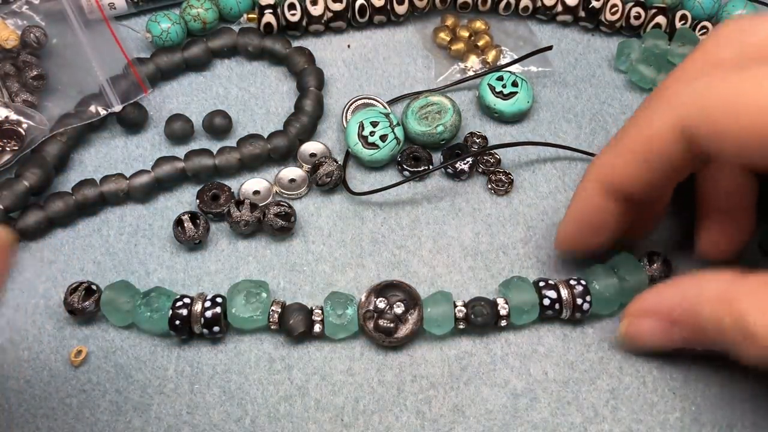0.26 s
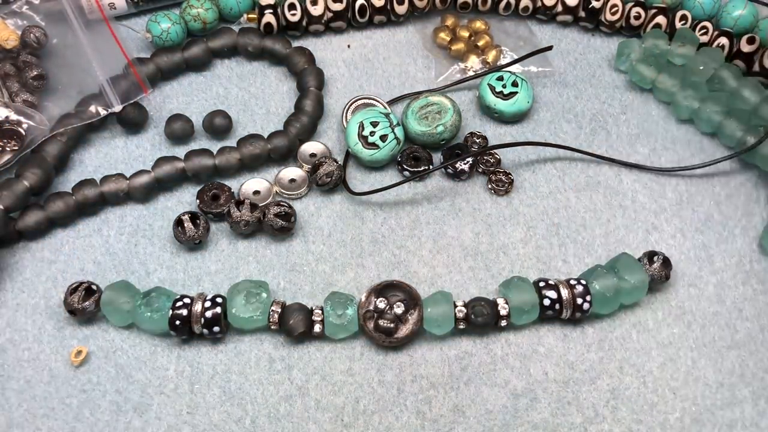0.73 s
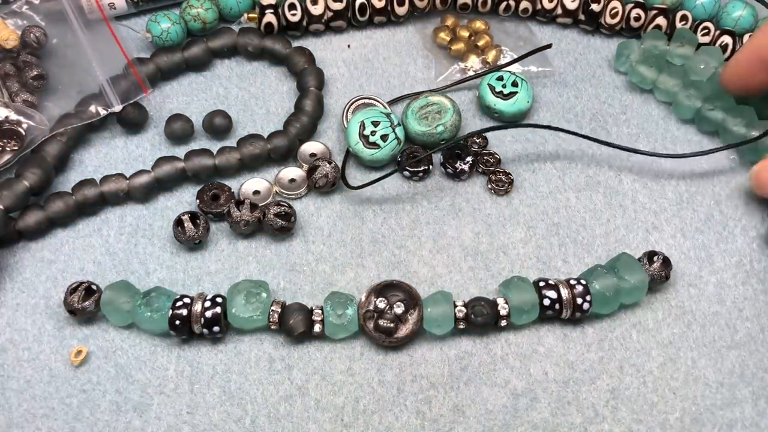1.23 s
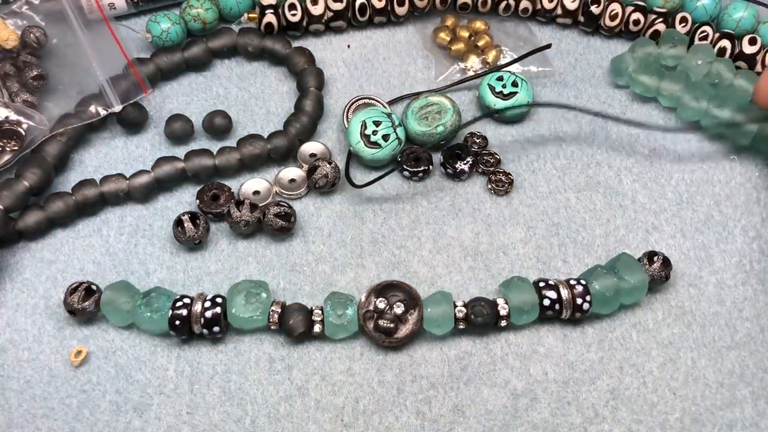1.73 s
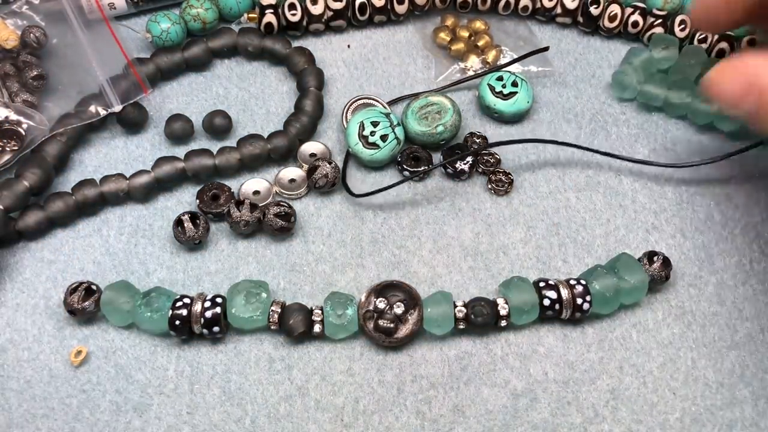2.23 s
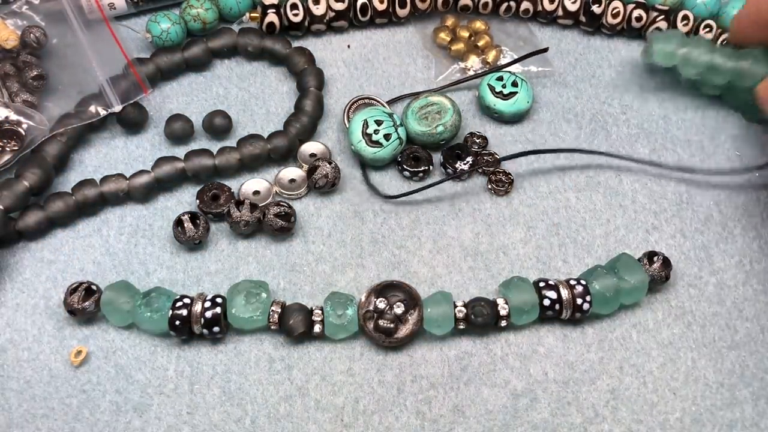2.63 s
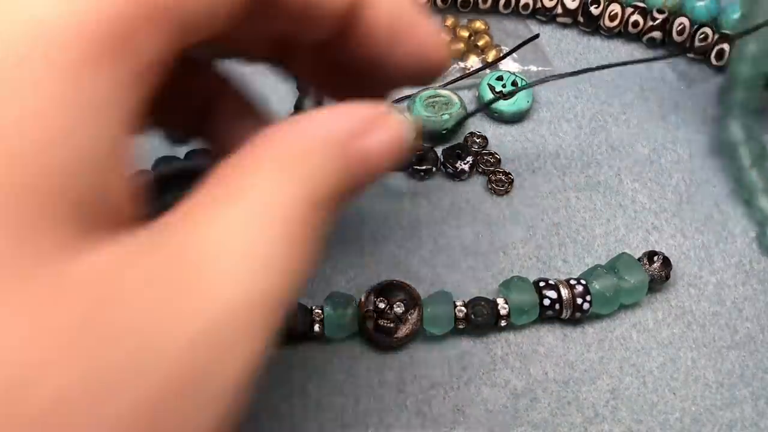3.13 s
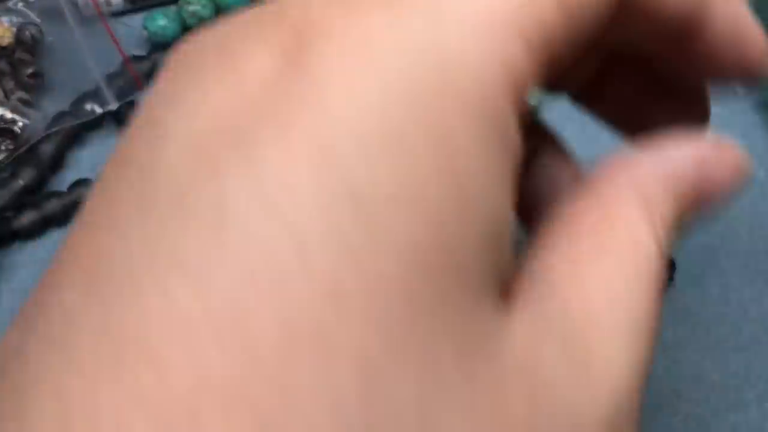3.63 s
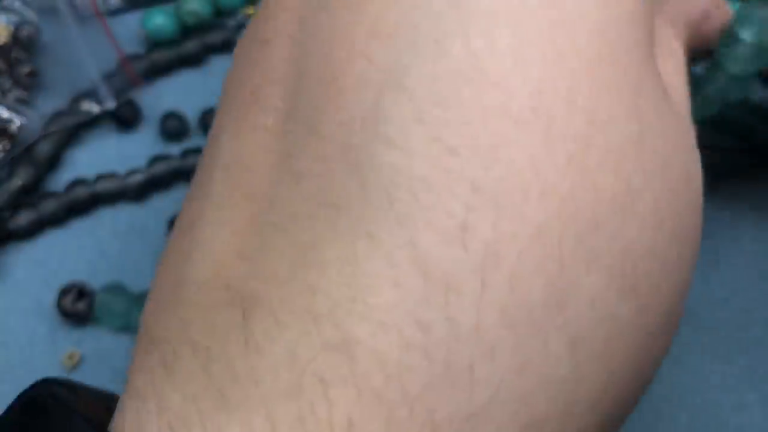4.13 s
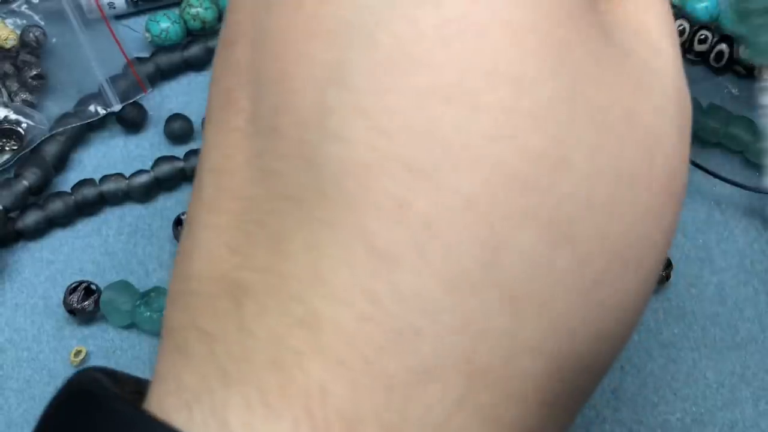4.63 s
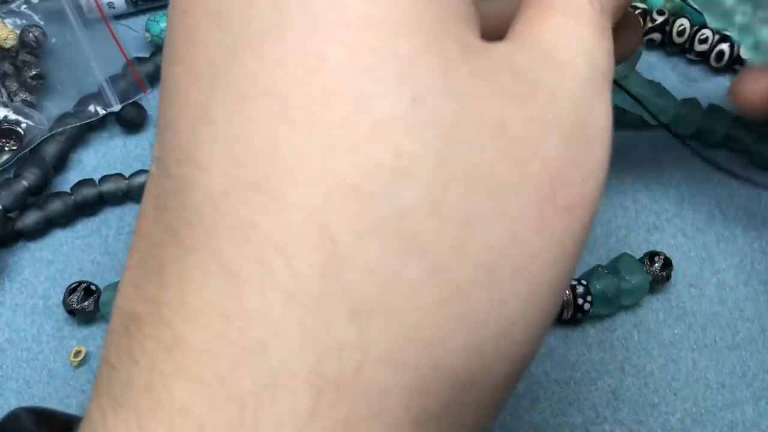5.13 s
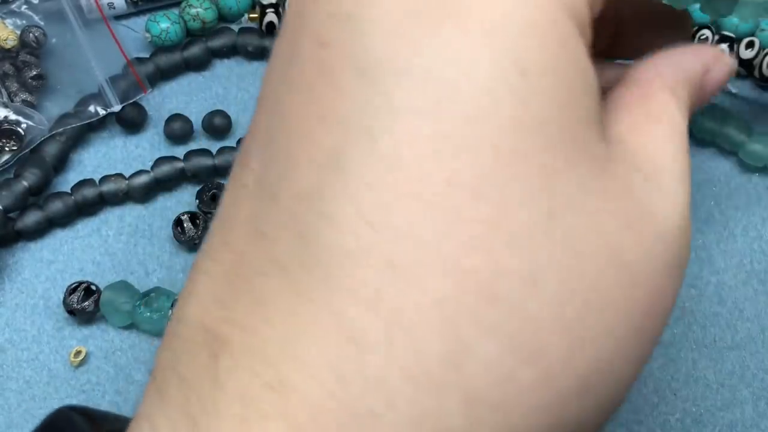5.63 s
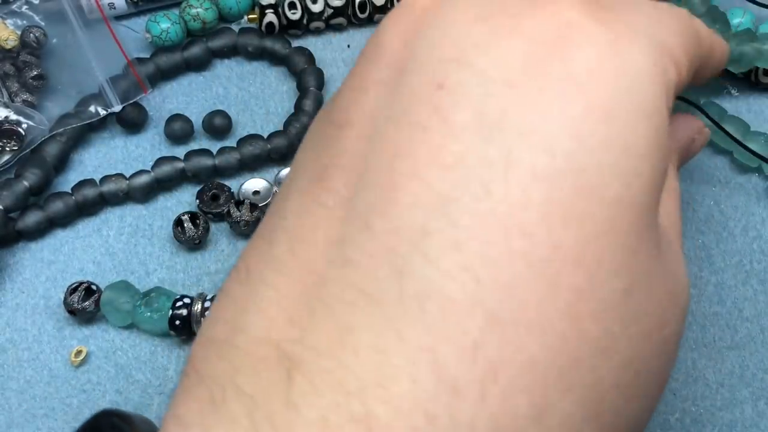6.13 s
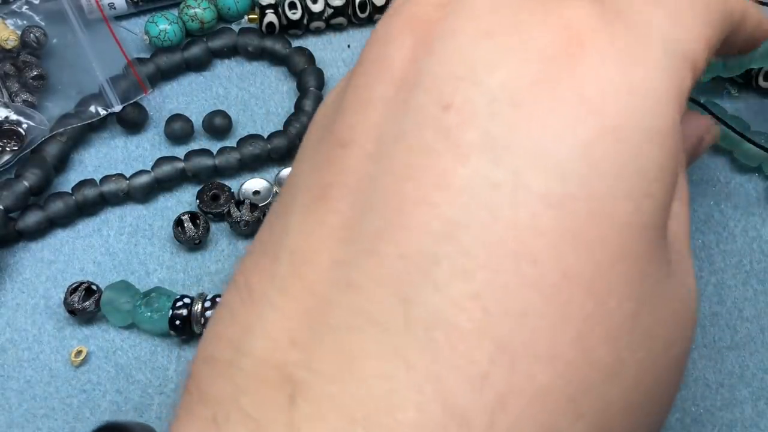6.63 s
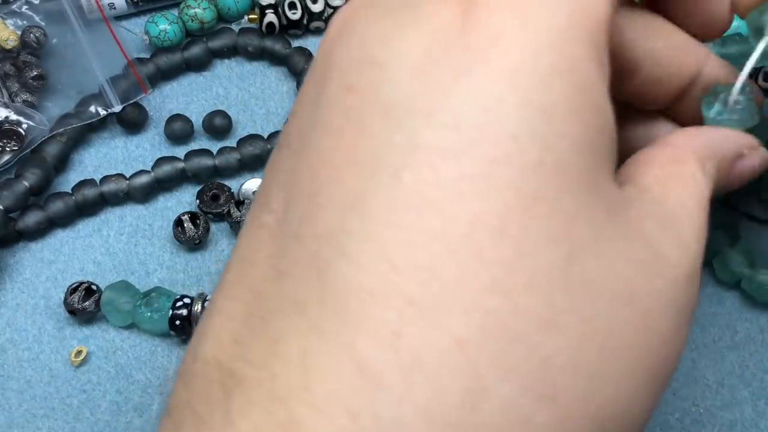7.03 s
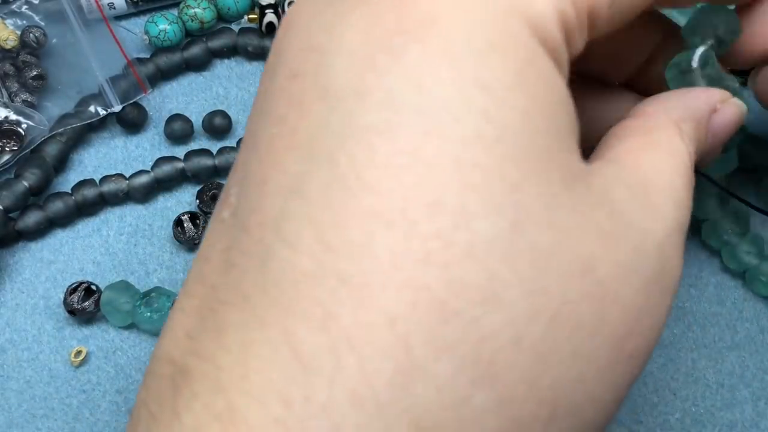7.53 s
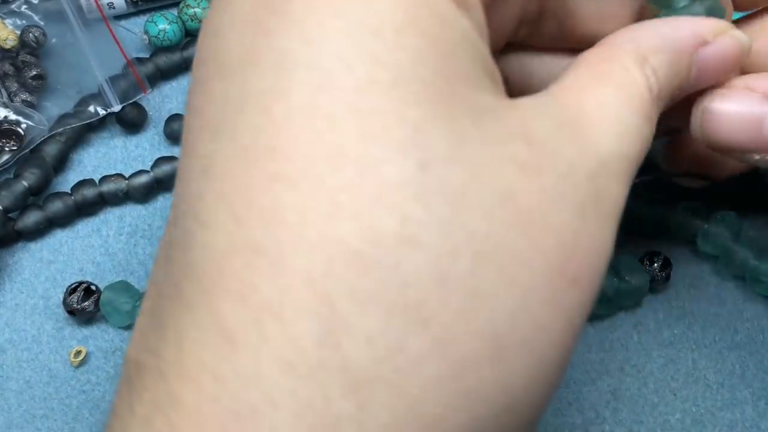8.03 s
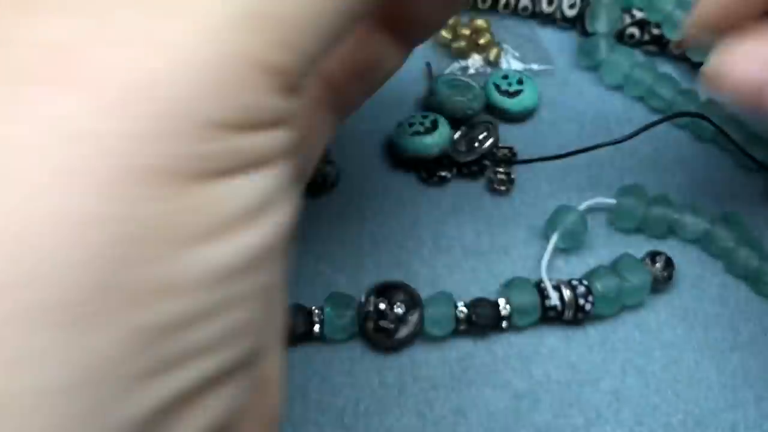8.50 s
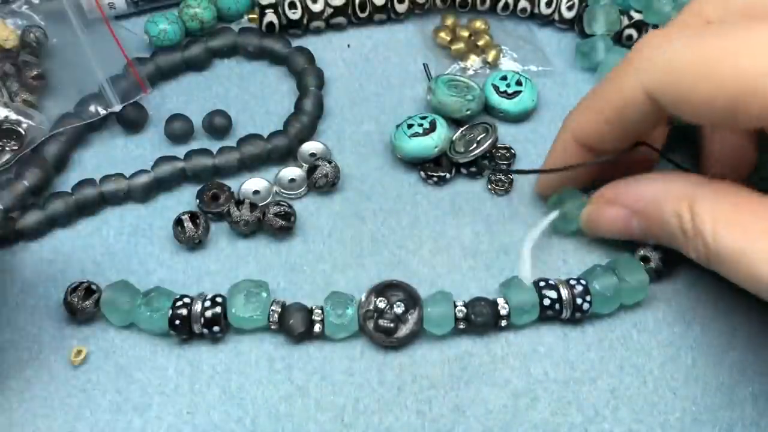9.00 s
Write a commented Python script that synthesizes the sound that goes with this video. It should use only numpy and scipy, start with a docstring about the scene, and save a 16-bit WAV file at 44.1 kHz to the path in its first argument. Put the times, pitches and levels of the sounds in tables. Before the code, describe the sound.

Tiny glass beads tick against one another in short, bright, irregular bursts, close up, with a little small-room reflection. Faint granular rattling and soft fabric brushing join them, along with occasional dull taps on a felt mat. The busiest handling comes in the first half; a hard snap and a small knock on the table follow, then lighter, scattered ticks and a last brief cluster. A quiet, steady room hush and low rumble lie underneath.

```python
"""In a quiet room, strands of frosted glass beads are lifted, dragged over a felt mat and fingered near a microphone.
Beads click in short dry rings set off by contacts, over a finer rattle of thousands of tiny random contacts;
felt dulls some taps. The strand and a sleeve brush the mat as shaped noise, and a bump rings the table's modes.
Below lie a steady hush and a slow rumble, both of shaped noise; the room scatters the bead sounds."""
import sys
import numpy as np
from scipy import signal
from scipy.fft import rfft, irfft, next_fast_len
from scipy.io import wavfile
from scipy.ndimage import uniform_filter1d

SR = 44100
rng = np.random.default_rng(int(sys.argv[2]) if len(sys.argv) > 2 else 0)


def store_pcm(level_fs):
    """Save levels as 16-bit WAV."""
    pcm = np.round(np.clip(level_fs, -1, 1) * 32767).astype(np.int16)
    wavfile.write(sys.argv[1], SR, np.atleast_2d(pcm).T)


N = 408366   # length in samples


def from_db(db):
    """Turn decibels into a plain factor on the wave's height."""
    return 10 ** (np.asarray(db) / 20)


def rms_one(x):
    """Scale a sound so that its average strength (rms) is 1."""
    return x / np.sqrt(np.mean(x ** 2) + 1e-20)


def in_time(rows):
    """Join the values of each table column by straight lines, at every sample; the first column is seconds."""
    s, *columns = np.transpose(rows)
    return [np.interp(np.arange(N) / SR, s, c) for c in columns]


def coloured(spectrum):
    """Noise of rms 1, its spectrum drawn by (Hz, relative dB per Hz) points on a log-frequency axis."""
    size = next_fast_len(N)
    hz, level_db = np.transpose(spectrum)
    grid = np.maximum(np.fft.rfftfreq(size, 1 / SR), 1)
    gain = from_db(np.interp(np.log(grid), np.log(hz), level_db, left=-90, right=-90))
    white = rng.standard_normal(size)
    return rms_one(irfft(rfft(white) * gain, size)[:N])


def drift(rate_hz):
    """Slow random wandering around 0, of spread 1: noise through two equal one-pole low-passes."""
    step = 40   # samples between computed points
    r = np.exp(-2 * np.pi * rate_hz * step / SR)
    noise = rng.standard_normal(N // step + 2002)
    slow = signal.lfilter([1], [1, -2 * r, r * r], noise)[2000:]   # skip the filter's start
    return np.interp(np.arange(N) / step, np.arange(len(slow)), rms_one(slow))


def ring(pushes, hz, t60):
    """A resonance: a push of 1 sets off a sine of height 1 that falls by 60 dB in t60 seconds."""
    r, w = from_db(-60 / (t60 * SR)), 2 * np.pi * hz / SR
    return signal.lfilter([0, np.sin(w)], [1, -2 * r * np.cos(w), r * r], pushes + 1e-18)


def strokes(rows, rest_db, rise_s, fall_s):
    """Gain of each level column: every stroke rises, holds and dies away, adding its power to a resting level."""
    t, rows = np.arange(0, N + 40, 40) / SR, np.array(rows)
    start, end = rows[:, :1], rows[:, :1] + rows[:, 1:2]
    rise = np.clip((t - start) / rise_s, 0, 1)
    shape = rise * np.exp(-np.maximum(t - end, 0) / fall_s)
    power = from_db(rows[:, 2:].T) ** 2 @ shape ** 2 + from_db(rest_db)[:, None] ** 2
    return [np.interp(np.arange(N) / SR, t, np.sqrt(p)) for p in power]


def hush(level_db):
    """Steady room noise, plus faint narrow bands made by noise driving resonances."""
    # Shape of the room noise. Each row: frequency in Hz, relative level in dB per Hz.
    hush_shape = [(18, -33), (30, -0.5), (41, -3.5), (75, -17), (106, -14.5), (233, -20), (273, -26.5),
                  (311, -37.5), (540, -33), (844, -34.5), (1130, -37), (1630, -36), (2900, -50),
                  (14400, -54), (16000, -58)]
    # Faint narrow bands. Each row: frequency in Hz, effective width in Hz, level in dB.
    narrow_bands = [(230.4, 11, -68.5), (246.3, 5.1, -71.5), (277.4, 7, -73.5), (309.5, 7, -73),
                    (373.3, 9, -78.5), (456, 14, -81), (1208, 7.9, -83), (1550, 19, -85.5)]
    sound = from_db(level_db) * coloured(hush_shape)
    for hz, width_hz, band_db in narrow_bands:
        band = ring(rng.standard_normal(N), hz, 3.3 / width_hz)   # a narrower band rings longer
        sound += from_db(band_db) * rms_one(band)
    return sound


def rumble(drone_gain_db):
    """Slow air movement on the microphone, mostly under 30 Hz, and a low drone that swells and sinks."""
    # Each row: time in seconds, air level in dB before its wandering, drone level in dB before its gain.
    rumble_levels = [(0, -45, -53.5), (1.5, -37, -56), (2.3, -42, -56), (2.9, -39, -52.5),
                     (4.4, -39.5, -46), (5.2, -40.5, -44), (6.8, -43.5, -51.5), (8.2, -37, -52),
                     (9.26, -41.5, -50.5)]
    air_db, drone_db = in_time(rumble_levels)
    air_noise = coloured([(1.5, 7.0), (3, 4.0), (17, 2.0), (29, -18.5), (45, -30.0), (70, -31.0)])
    air = from_db(air_db + 1.73 * drift(0.6)) * air_noise
    drone_noise = coloured([(40, -24.5), (60, 3.5), (110, -8.5), (160, -3.5)])
    return air + from_db(drone_db + drone_gain_db) * drone_noise


def rattle(per_s, spread_db, cycles):
    """Many tiny contacts in clumps, dealt to short resonances of large beads (lower) and small contacts (higher)."""
    # The strand is moved. Each row: start in seconds, length in seconds, large beads in dB, small contacts in dB.
    moves = [(.15, 0.11, -81, -100), (1.0, 0.19, -74.5, -85), (1.255, 0.13, -66.5, -80),
             (1.49, 0.048, -66.5, -80), (1.67, 0.094, -66.5, -72), (1.925, 0.1, -65.5, -73),
             (2.27, 0.23, -69, -84), (2.55, 0.9, -66, -73.5), (3.52, 0.46, -70, -72),
             (4.05, 0.57, -76.5, -76.5), (4.45, 0.25, -78, -75), (5.04, 0.29, -76.5, -76),
             (5.42, 0.28, -75.5, -74.5), (5.76, 0.53, -77.5, -76), (6.1, 0.16, -71, -84),
             (6.3, 0.43, -74, -83), (6.75, 0.47, -75, -77), (7.42, 0.07, -81, -78), (7.64, 0.37, -81, -81),
             (8.38, 0.31, -72, -74.5), (8.72, 0.37, -76, -80)]
    large, small = strokes(moves, rest_db=(-84.5, -95.5), rise_s=.019, fall_s=.056)
    sizes = from_db(spread_db * np.minimum(rng.exponential(1, N), 5)) * rng.choice([-1, 1], N)
    chance = per_s * from_db(3.0 * drift(30)) / SR   # wanders, so contacts clump
    born = sizes * (rng.random(N) < chance)
    dealt = rng.integers(0, 16, N)
    rings = []
    for k, hz in enumerate(np.geomspace(3200, 15000, 16)):
        rings.append(ring(born * (dealt == k), hz, cycles / hz))
    return large * rms_one(sum(rings[:8])) + small * rms_one(sum(rings[8:]))


def brushing(soft_gain_db, drag_gain_db, swish_gain_db):
    """Strand and sleeve rub the mat: smooth noise in three colours, made lumpy by slow wandering of its level."""
    # Each row: start in seconds, length in seconds, then soft rumble, strand drag and swish in dB before gain.
    rubs = [(.2, 0.61, -50.5, -67, -89), (.9, 0.88, -56, -73, -79), (2.53, 0.89, -54, -60, -67),
            (2.75, 0.15, -51.5, -67, -63.5), (2.9, 0.33, -54, -56.5, -61), (3.7, 0.27, -56, -65, -69),
            (4.2, 0.54, -55, -63, -73), (4.8, 0.92, -58.5, -71.5, -73.5), (5.98, 0.57, -65, -60, -75.5),
            (6.24, 0.014, -66, -55, -63), (6.92, 0.14, -56, -68.5, -74), (8.37, 0.1, -48.5, -59, -68.5),
            (8.55, 0.67, -57.5, -67.5, -73)]
    # Soft brushing, lifted at resonances of table and room. Each row: frequency in Hz, relative dB per Hz.
    soft_shape = [(60, -23), (140, -1), (200, -0.5), (236, 2.5), (258, -5), (300, -3.5), (370, -10),
                  (450, -28.5)]
    # Drag of the strand. Each row: frequency in Hz, relative dB per Hz.
    drag_shape = [(250, -17.5), (350, 0.5), (460, 0.5), (600, -7.5), (900, -8.5), (1300, -22.5)]
    # Swish. Each row: frequency in Hz, relative dB per Hz.
    swish_shape = [(700, -48), (1000, -5.5), (1500, 0), (2200, 1), (3000, -8.5), (4500, -14.5)]
    soft, drag, swish = strokes(rubs, rest_db=(-63, -74.5, -78.5), rise_s=.017, fall_s=.096)
    soft = soft * from_db(soft_gain_db + 1.18 * drift(5.8)) * coloured(soft_shape)
    drag = drag * from_db(drag_gain_db + 1.14 * drift(16)) * coloured(drag_shape)
    swish = swish * from_db(swish_gain_db + 1.55 * drift(10.4)) * coloured(swish_shape)
    return soft + drag + swish


def clicks(gain_db, high_gain_db, chatter_s, chatter, snap_cycles, ping_cycles, ping_db, colour_db,
           low_db, contact_s, focus_db):
    """A tick and its dying micro-ticks ring short uneven modes, new for each knock, and one longer ping."""
    # Bead on bead, one row a knock. Each row: time in seconds, ping pitch in Hz,
    # peak level in dB of the middle part before gain, peak level in dB of the high part before gains.
    knocks = [(0.2128, 4500, -57.5, -75), (1.0396, 4100, -55, -67), (1.0427, 4100, -52, -61),
              (1.058, 3790, -52, -54), (1.067, 4180, -54, -62), (1.1521, 4130, -56, -72),
              (1.274, 3920, -44.5, -63), (1.3163, 4480, -54, -70), (1.345, 4030, -57, -66),
              (1.3818, 3400, -55, -73), (1.396, 3550, -57, -71), (1.4178, 3730, -61, -72),
              (1.492, 3900, -54, -73), (1.508, 4070, -54, -77), (1.5488, 5120, -53, -64),
              (1.5603, 4330, -51, -63), (1.565, 4970, -56, -69), (1.5946, 4950, -37.5, -52),
              (1.605, 3490, -55, -59), (1.675, 3860, -50, -70), (1.6887, 5170, -50.5, -68),
              (1.699, 3870, -49, -68), (1.7242, 5100, -45, -52), (1.732, 5710, -47, -53),
              (1.7778, 9260, -60, -56), (1.781, 7600, -56, -52), (1.7925, 5990, -50, -54),
              (1.8328, 4000, -50, -51), (1.8371, 6200, -51, -55), (1.8423, 5200, -56, -65),
              (1.9748, 4110, -67, -53), (1.9865, 6220, -54, -55), (2.0001, 6240, -43, -47),
              (2.008, 6000, -43, -48), (2.011, 6010, -38, -44), (2.015, 5700, -40.5, -46),
              (2.0178, 3860, -40, -48), (2.0206, 4590, -49, -52), (2.0237, 5760, -43, -42),
              (2.0263, 5490, -41, -45), (2.0323, 9260, -52, -46), (2.265, 5900, -51, -64),
              (2.3036, 4100, -44.5, -51), (2.3076, 5840, -45, -55), (2.312, 5150, -48, -56),
              (2.316, 3670, -52, -56), (2.3208, 8750, -60, -55), (2.3709, 3850, -53, -74),
              (2.3831, 3620, -55, -69), (2.3921, 3810, -51, -61), (2.5305, 3760, -40, -58),
              (2.5372, 4200, -45, -55), (2.5435, 3930, -37, -55), (2.5503, 3450, -46, -58),
              (2.5563, 5750, -39, -62), (2.558, 5630, -45, -53), (2.565, 3730, -44, -68),
              (2.567, 5630, -44, -61), (2.5726, 3960, -48, -59), (2.6448, 4500, -59, -70),
              (2.6531, 4570, -49, -67), (2.702, 4560, -48, -59), (2.7141, 4780, -50, -61),
              (2.7517, 3470, -50, -54), (2.7547, 4500, -53, -66), (2.774, 5800, -50, -61),
              (2.8263, 4900, -52, -60), (2.9456, 7360, -53, -57), (3.06, 5750, -46, -52),
              (3.0719, 5060, -45, -59), (3.0766, 4330, -44, -54), (3.0821, 12900, -45, -43),
              (3.1513, 4290, -55, -67), (3.274, 5490, -53, -56), (3.3023, 5600, -43.5, -47),
              (3.3346, 14490, -55, -44), (3.338, 5500, -49, -56), (3.3873, 5200, -51, -65),
              (3.4143, 4050, -55, -74), (3.4326, 10640, -49, -48), (3.4595, 12750, -62, -50),
              (3.466, 4650, -54, -54), (3.56, 11000, -50, -48), (3.5652, 10140, -57, -59),
              (3.578, 4870, -53, -70), (3.63, 4050, -43, -62), (3.6368, 9220, -34.5, -34),
              (3.6378, 11600, -40, -35), (3.6469, 11200, -33, -29), (3.649, 6910, -40, -40),
              (3.657, 8030, -47, -37), (3.659, 10190, -43, -39), (3.673, 11330, -44, -44),
              (3.739, 4130, -62, -61), (3.765, 13090, -69, -55), (3.773, 4500, -56, -67),
              (3.779, 5680, -51, -63), (3.8613, 3420, -47, -51.5), (3.8993, 3340, -53, -56),
              (3.9046, 3810, -53, -60), (4.0764, 10570, -48.5, -51), (4.0854, 4970, -50, -54),
              (4.1109, 12730, -57, -49), (4.128, 4780, -46, -54), (4.1338, 6000, -52, -56),
              (4.1364, 5640, -49, -49), (4.1425, 5100, -50, -52), (4.153, 12830, -55, -51),
              (4.199, 3640, -58, -67), (4.2101, 10680, -52, -53), (4.2584, 11000, -64, -52.5),
              (4.2734, 5210, -63, -62), (4.4495, 9100, -61, -58), (4.4898, 6980, -52, -55),
              (4.5075, 9400, -59, -44), (4.5061, 14900, -41, -38.5), (4.5085, 5600, -41, -49),
              (4.5168, 6570, -56, -56), (4.5422, 13870, -54, -38), (4.5475, 14130, -53, -37),
              (4.553, 8900, -42, -45), (4.5607, 9100, -53, -48), (4.5715, 11300, -51, -46),
              (4.67, 9100, -58, -51), (4.6754, 9150, -53, -51), (4.684, 8420, -68, -57),
              (4.7928, 5940, -61, -79), (5.1373, 7000, -42.5, -59), (5.1422, 8810, -53, -47.5),
              (5.1462, 6060, -48.5, -61), (5.202, 10100, -62, -49), (5.2362, 8400, -63, -48.5),
              (5.2661, 8740, -55, -55), (5.4655, 9930, -60, -55), (5.4756, 6740, -55, -61),
              (5.4883, 14800, -61, -46), (5.518, 7430, -62, -57), (5.6224, 7320, -55, -58),
              (5.725, 11690, -63, -53), (5.7378, 13090, -62, -52), (5.7831, 10490, -65, -55),
              (5.853, 3500, -58.5, -71), (5.9168, 4930, -50, -51), (5.9432, 13350, -56, -47),
              (5.9573, 13700, -55, -55), (5.9637, 13630, -39, -30.5), (5.9687, 12250, -50, -48),
              (5.9721, 4600, -34, -30), (5.9753, 5150, -28, -28.5), (5.9801, 13330, -38, -31),
              (5.9857, 8940, -46, -41), (5.9878, 8910, -51, -41), (5.9908, 9220, -53, -44),
              (5.9943, 9650, -54, -51), (6.1456, 5120, -62, -66), (6.2165, 4400, -48, -62),
              (6.2398, 4640, -42.5, -51), (6.256, 4100, -56, -49), (6.258, 6070, -47.5, -55),
              (6.2656, 10830, -57, -54), (6.3188, 4480, -58, -75), (6.3294, 4520, -55, -80),
              (6.3398, 8980, -65, -63), (6.3639, 4130, -57, -75), (6.3806, 4470, -50, -72),
              (6.3882, 4940, -51, -74), (6.4757, 9650, -61, -56), (6.4945, 14400, -53, -44.5),
              (6.5255, 4800, -44, -48), (6.5311, 9020, -49, -48), (6.537, 13720, -59, -45),
              (6.5463, 13000, -45.5, -38), (6.5517, 10900, -61, -43), (6.556, 12490, -55, -49),
              (6.585, 11860, -61, -56), (6.6115, 7990, -52, -55), (6.6185, 10440, -66, -56),
              (6.6224, 11500, -53, -47), (6.6261, 3900, -58, -55), (6.63, 12730, -49, -46),
              (6.6372, 13420, -60, -50), (6.8235, 14000, -50, -40), (6.832, 14580, -53, -45),
              (6.8422, 11900, -53, -51), (6.9858, 10600, -60, -49), (7.0675, 4890, -63, -68),
              (7.081, 5470, -51, -64), (7.108, 4440, -54, -61), (7.123, 9370, -51, -55),
              (7.171, 9100, -47, -45.5), (7.18, 8590, -53, -50), (7.1862, 7200, -57, -52),
              (7.239, 12270, -53, -49), (7.6086, 4260, -58, -73), (7.695, 6300, -51, -59),
              (7.7022, 5160, -50, -62), (7.77, 5330, -55, -64), (7.7772, 5400, -57, -72),
              (7.9363, 11930, -59, -52), (8.5053, 5750, -46, -52), (8.5727, 5210, -42, -46),
              (8.577, 5840, -38.5, -45), (8.579, 4700, -42, -37), (8.585, 6200, -45, -57),
              (8.589, 5990, -48, -62), (8.6639, 5550, -47, -68), (8.8435, 5360, -47, -65),
              (8.8811, 6350, -58, -74)]
    # The two borders in Hz between the low, middle and high parts of a click.
    borders_hz = [3300, 7600]
    rows, span, count = np.array(knocks), np.arange(400), 20   # samples of a click, number of short modes
    start_s, ping_hz, middle_db, high_db = rows[:, :1], rows[:, 1:2], rows[:, 2], rows[:, 3]
    draw = rng.standard_normal((len(rows), len(span) + 2 * count))
    colour_draw, pitch_draw = draw[:, -2 * count:-count], draw[:, -count:]

    ticks = draw[:, :len(span)] ** 3 * chatter * np.exp(-span / (chatter_s * SR))   # cubing makes them sparse
    ticks[:, 0] = np.sign(draw[:, 0])   # the main tick

    hz = np.c_[np.geomspace(1150, 15000, count) * np.exp(.04 * pitch_draw), ping_hz]
    level_db = np.c_[colour_db * colour_draw, np.full(len(rows), ping_db)]
    octaves_away = np.minimum(abs(np.log2(hz / ping_hz)), 1)
    level_db -= focus_db * octaves_away * (hz > borders_hz[0])   # weaker away from the ping
    turns = hz[:, :, None] * span / SR   # cycles since the knock
    fade_db = 60 * turns / np.r_[np.full(count, snap_cycles), ping_cycles][:, None]
    onset = 1 - np.exp(-span / (contact_s * SR))
    modes = np.sin(2 * np.pi * turns) * from_db(level_db[:, :, None] - fade_db) * onset
    modes[:, ::2] *= -1   # every other mode starts the other way

    at, out = np.round(start_s * SR).astype(int) + span, 0
    for part, peak_db in enumerate([middle_db + low_db, middle_db, high_db + high_gain_db]):
        in_part = np.digitize(hz, borders_hz) == part
        sound = np.sum(modes * in_part[:, :, None], axis=1)
        sound = signal.fftconvolve(ticks, sound, axes=1)[:, :len(span)]
        height = np.sqrt(2 * uniform_filter1d(sound ** 2, size=20, axis=1).max(axis=1))   # smoothed peak
        sound = sound * (from_db(peak_db + gain_db) / height)[:, None]
        out = out + np.bincount(at.ravel(), sound.ravel(), N)[:N]
    return out


def taps(gain_db, cycles):
    """Dull taps of a bead on the mat: felt softens the contact to a short, lower ring."""
    # Each row: time in seconds, peak level in dB before gain, pitch in Hz.
    mat_taps = [(1.272, -55, 2270), (1.56, -51, 2370), (1.6665, -53, 2610), (2.264, -53, 2340),
                (2.3, -52, 2160), (4.1288, -47, 1730), (4.137, -49.5, 1600), (4.5404, -51, 1590),
                (4.668, -51.5, 1830), (6.8104, -50.5, 1530), (7.691, -51.5, 1940)]
    out = np.zeros(N)
    for s, level_db, hz in mat_taps:
        push = 1.0 * (np.arange(N) == round(s * SR))
        out += from_db(level_db + gain_db) * ring(push, hz, cycles / hz)
    return out


def table(gain_db):
    """A bump and its three rebounds ring the modes of the table top."""
    # Each row: time of the bump or rebound in seconds, strength of the push in dB before gain.
    bumps = [(6.24, -37), (6.2505, -43), (6.261, -44), (6.2905, -44.5)]
    # Modes of the table top. Each row: frequency in Hz, relative level in dB, time to fall 60 dB in seconds.
    table_modes = [(577, 3.5, 0.078), (624, 0.5, 0.18), (656, -1, 0.22), (753, 3, 0.045), (1180, -5, 0.051),
                   (1560, 3.5, 0.036), (2020, -7, 0.04)]
    blow = np.zeros(N)
    for s, level_db in bumps:
        blow[round(s * SR)] = from_db(level_db + gain_db)
    return sum(from_db(level_db) * ring(blow, hz, t60) for hz, level_db, t60 in table_modes)


def room(x, near_db, near_t60, far_db):
    """Diffuse scatter, never twice alike as the hands move: in each band, noise carries the energy on and dies."""
    # Fading of the room. Each row: frequency in Hz, time to fall 60 dB in seconds.
    room_fade = [(500, 0.71), (3000, 0.2), (8000, 0.23), (15000, 0.15)]
    fade_hz, fade_s = np.transpose(room_fade)
    out, edges = np.zeros(N), 400 * 2 ** np.arange(0, 5.6, .5)   # half-octave bands
    white = rng.standard_normal((2, N))
    for k, (low, high) in enumerate(zip(edges, edges[1:])):
        band = signal.butter(2, [low, high], "band", fs=SR, output="sos")
        far_t60 = np.interp(np.log(low * high) / 2, np.log(fade_hz), fade_s)
        power, energy = signal.sosfilt(band, x) ** 2, 0
        for share_db, t60 in (near_db, near_t60), (far_db, far_t60):   # mat and hands, then the walls
            keep = from_db(-120 / (t60 * SR))   # power kept from one sample to the next
            share = from_db(2 * share_db)   # doubled dB, because this is power
            energy = energy + signal.lfilter([(1 - keep) * share], [1, -keep], power)
        out += np.sqrt(energy) * rms_one(signal.sosfilt(band, white[k % 2]))   # neighbours use other noise
    return out


def scene():
    """Beads with their scatter in the room, table and cloth, over hush and rumble."""
    background = hush(level_db=-54) + rumble(drone_gain_db=-10.0)
    beads = rattle(per_s=3600, spread_db=2.8, cycles=22.0)   # cycles: until a ring has fallen 60 dB
    cloth = brushing(soft_gain_db=-4.0, drag_gain_db=-2.5, swish_gain_db=-4.0)
    beads = beads + clicks(gain_db=-1.0, high_gain_db=2.5, chatter_s=.0018, chatter=.045, snap_cycles=19.0,
                           ping_cycles=36.0, ping_db=4, colour_db=3.5, low_db=-13.5, contact_s=.00012,
                           focus_db=13)
    beads = beads + taps(gain_db=8.5, cycles=5.2)
    wet = room(beads, near_db=-7, near_t60=.03, far_db=-7.5)
    return (beads + wet + table(gain_db=-12.0) + cloth + background)[None]


def record(dry):
    """The microphone fades a little at the top, then everything above about 16 kHz is cut steeply."""
    dry = signal.sosfilt(signal.butter(2, 16500, fs=SR, output="sos"), dry)
    cut = signal.cheby2(14, 65, 16400, fs=SR, output="sos")   # 65 dB down from 16400 Hz up
    return signal.sosfilt(cut, dry)


dry = scene()
out = record(dry)
store_pcm(out)
```